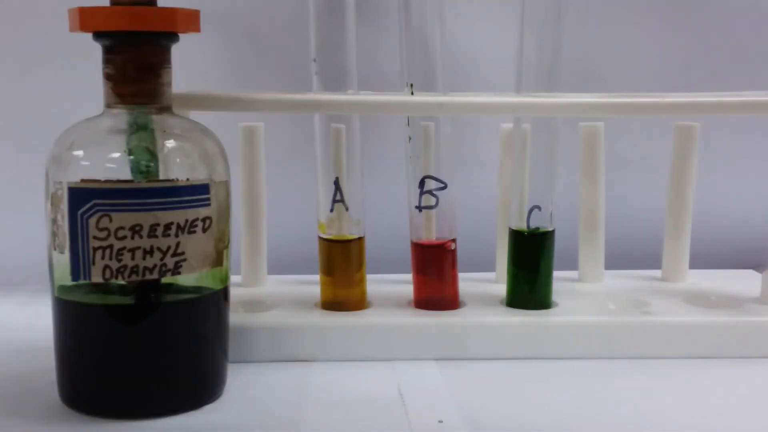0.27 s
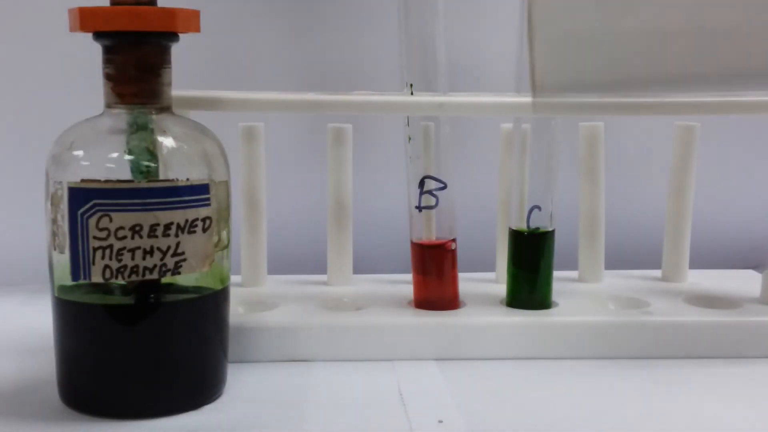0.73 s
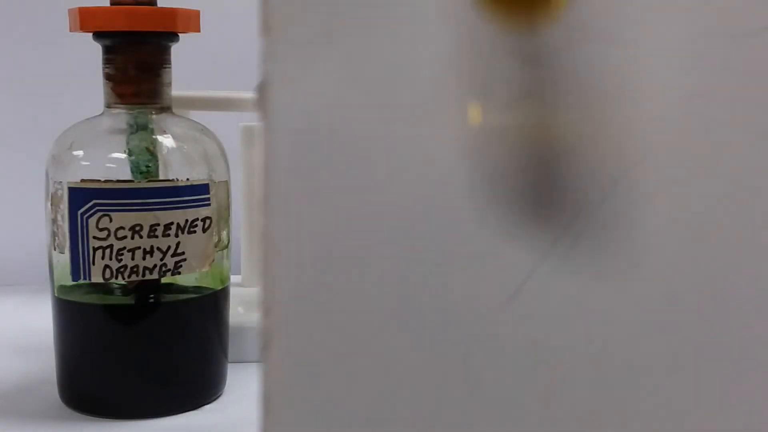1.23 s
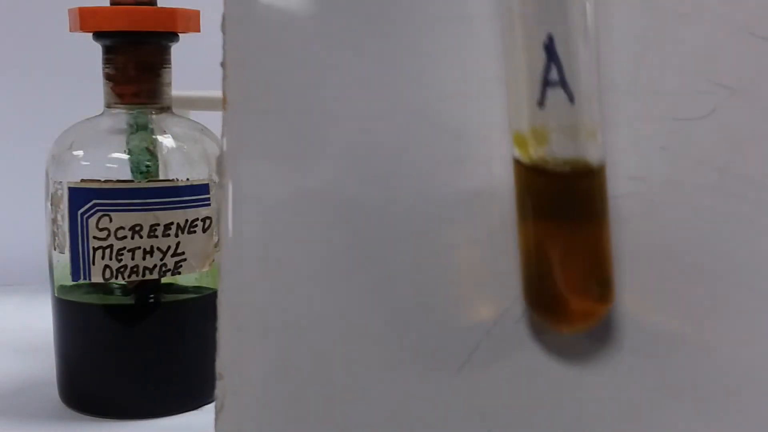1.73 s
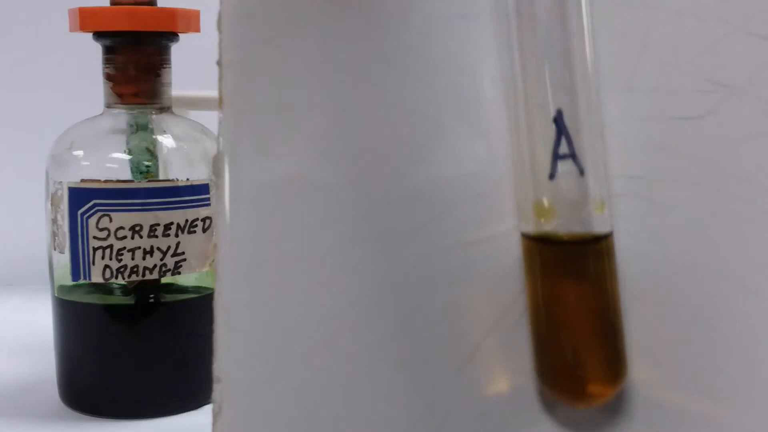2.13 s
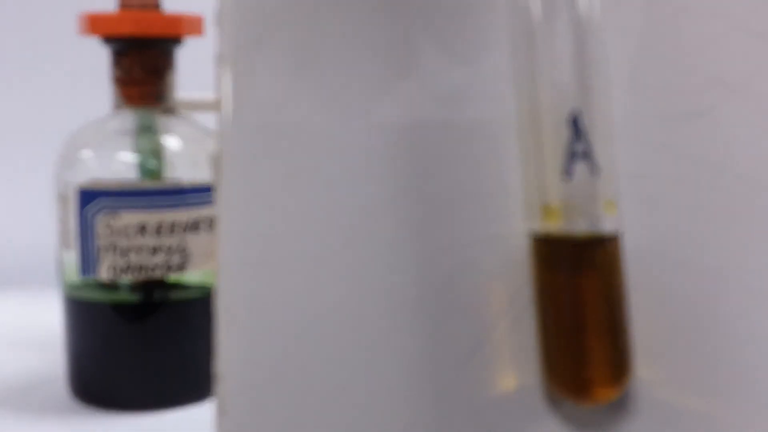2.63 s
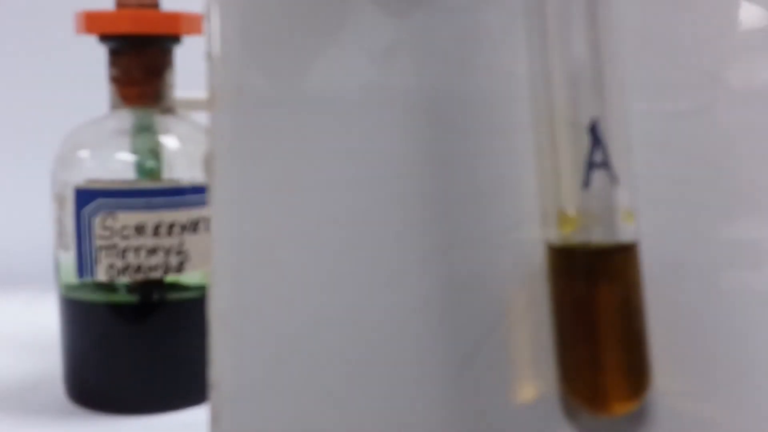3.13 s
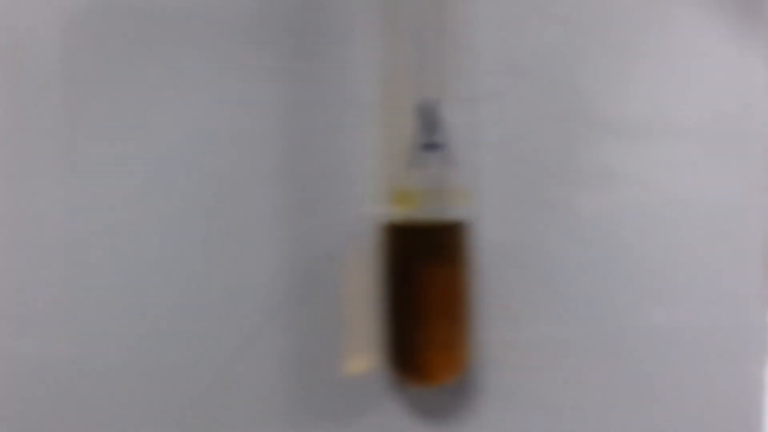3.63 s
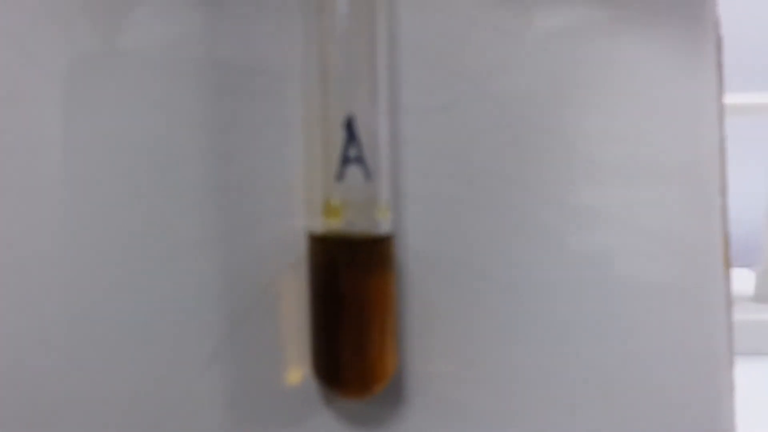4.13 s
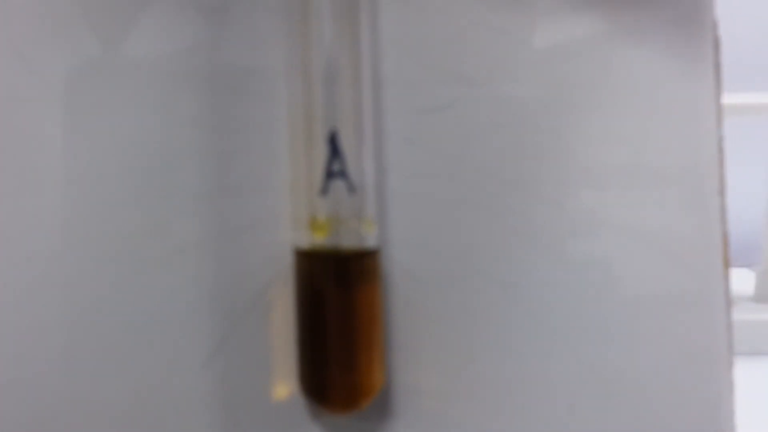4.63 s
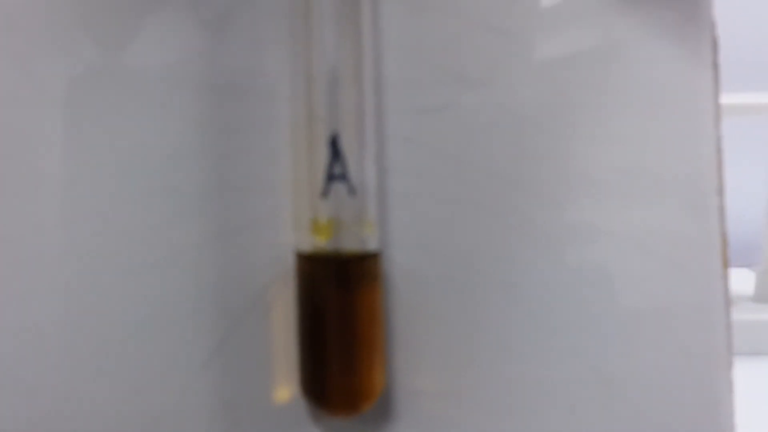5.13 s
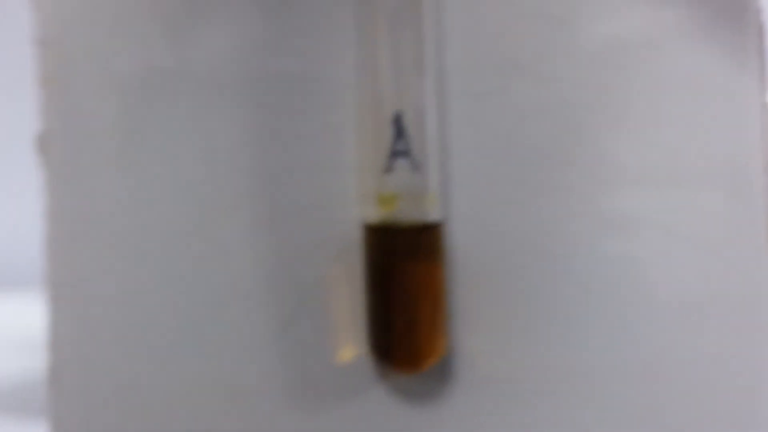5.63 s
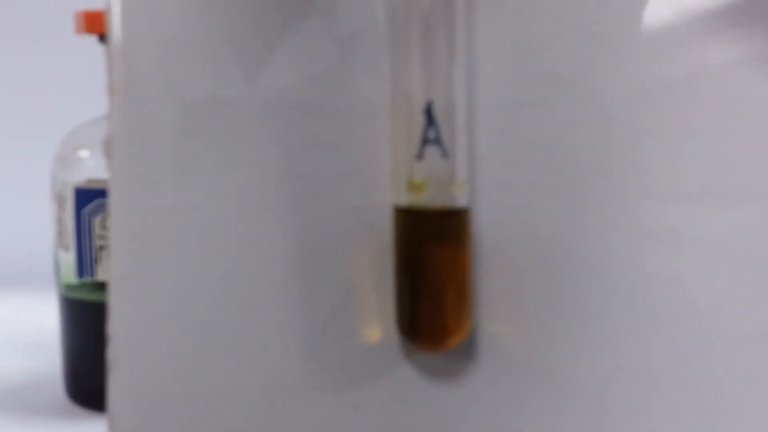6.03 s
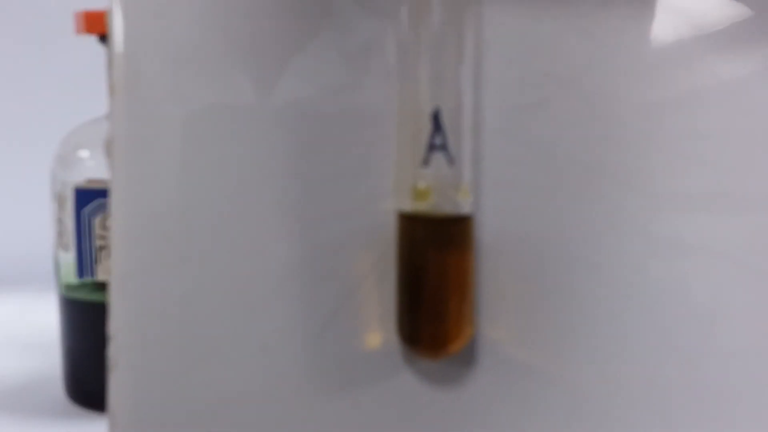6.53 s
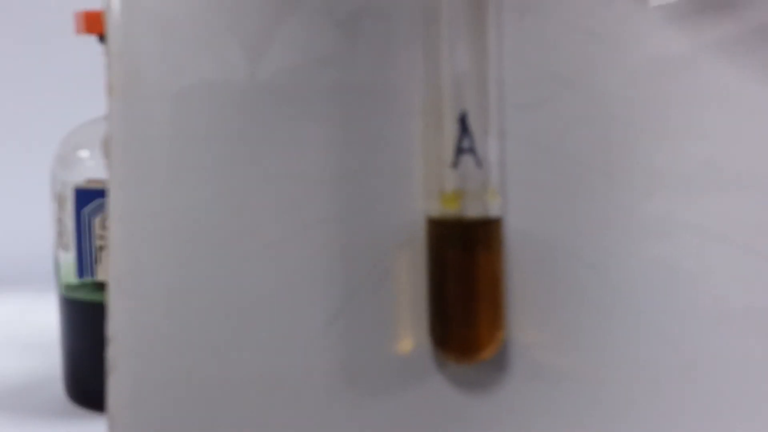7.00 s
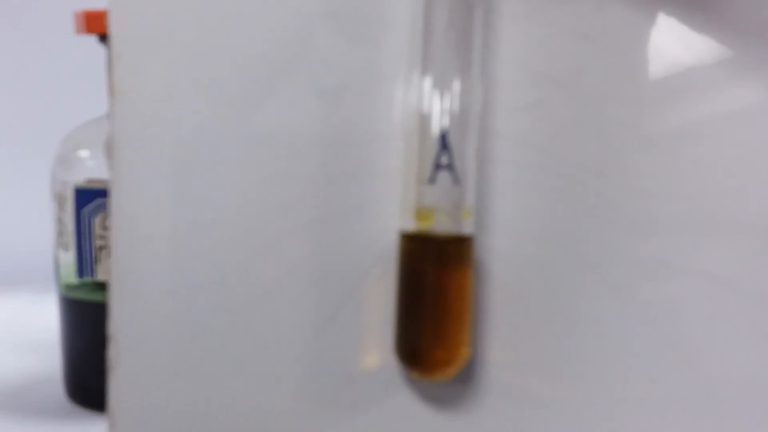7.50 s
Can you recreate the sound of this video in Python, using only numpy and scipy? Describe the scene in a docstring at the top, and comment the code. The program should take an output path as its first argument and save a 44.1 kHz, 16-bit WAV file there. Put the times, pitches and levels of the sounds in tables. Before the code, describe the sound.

Close, short glassy clinks and dull bumps of a test tube against ceramic, with tiny ticks and faint scrapes, above a quiet low hum.

```python
"""A glass test tube clinks and bounces on a ceramic tile, close to one microphone in a bare laboratory.
Each clink sums decaying glass modes and a noise crack; bumps ring the tile and bench, lower and softer.
Finger and grit ticks are tiny cracks with a high resonance; sliding glass is grainy friction noise.
Behind them hard walls return a diffuse tail of glass and tile, a far engine hums on two wavering orders,
and smooth noise makes the rush of the room. Both channels carry the same sound."""
import sys
import numpy as np
from scipy import signal
from scipy.fft import rfft, irfft
from scipy.io import wavfile

SR = 44100
rng = np.random.default_rng(int(sys.argv[2]) if len(sys.argv) > 2 else 0)


def master(y):
    """Save y as 16-bit WAV."""
    cut = np.clip(np.atleast_2d(y).T, -1, 1)
    pcm = np.round(cut * 32767)  # scale
    wavfile.write(sys.argv[1], SR, pcm.astype(np.int16))


N = 342216   # length of the scene [samples]

# Modes of the filled tube: (frequency [Hz], relative level [dB], free decay by 60 dB [s]);
# each contact sets the level and shortens or stretches the decay
TUBE_MODES = [(1110, 0, .13), (2822, 0, .075), (4675, 0, .05), (560, -9, .05), (1230, -12, .02),
              (1450, -1, .02), (1790, -3, .03), (2050, -11, .02), (3340, -8, .04), (3830, 0, .035),
              (4250, -8, .03), (5150, -4, .08), (5420, -3, .07), (5780, -5, .06), (6600, -10, .04),
              (6950, -3, .05), (7310, -3, .06), (8200, -7, .04), (9120, -8, .03), (9850, -1, .025),
              (10300, -6, .03), (11900, -6, .02), (12350, -1, .04), (13700, -9, .04), (14500, -10, .04)]
SPREAD_DB = 1.2          # the strike point changes each mode's share by about this much
STRIKE_CONTACT_S = 0.00065   # clinks and bumps


def from_db(db):
    """Gain of a level in dB."""
    return 10 ** (np.asarray(db) / 20)


def rms_one(x):
    """Scale to rms 1."""
    return x / np.sqrt(np.mean(x ** 2) + 1e-20)


def in_time(rows):
    """Columns of a curve table, one value a sample."""
    s, *columns = np.transpose(rows)
    return [np.interp(np.arange(N) / SR, s, column) for column in columns]


def at_hz(points, hz):
    """Read a spectrum on a log-frequency axis."""
    point_hz, values = np.transpose(points)
    return np.interp(np.log(hz + 1e-9), np.log(point_hz), values)


def coloured(x, spectrum):
    """Give white input the shape of the spectrum; rms 1."""
    gain = from_db(at_hz(spectrum, np.fft.rfftfreq(N, 1 / SR)))
    return rms_one(irfft(rfft(x) * gain, N))


def drift(rate_hz):
    """Slow random wander of spread 1: noise low-passed at the rate, its first second dropped."""
    lowpass = signal.butter(2, rate_hz, fs=SR, output="sos")
    return rms_one(signal.sosfilt(lowpass, rng.standard_normal(N + SR))[SR:])


def dying(length, t60):
    """Exponential decay over a number of samples, 60 dB down after t60 seconds."""
    return from_db(-60 * np.arange(length) / SR / t60)


def add(out, s, sound):
    """Mix a sound in at a time in seconds."""
    i = round(s * SR)
    out[i:i + len(sound)] += sound[:N - i]


def struck(hz, level_db, t60, contact_s):
    """Sum of decaying modes, a third of a second long; they swell while the contact lasts."""
    t = np.arange(SR // 3) / SR
    envelopes = from_db(level_db[:, None] - 60 * t / t60[:, None])
    modes = envelopes * np.sin(2 * np.pi * hz[:, None] * t)
    swell = np.sin(np.pi / 2 * np.clip(t / contact_s, 0, 1)) ** 2
    return modes.sum(axis=0) * swell


def clinks():
    """Each contact feeds the mode families in its own shares; the grip sets the ring; a crack fills between modes."""
    # Tube meets tile: (time [s], first bending note [dB], second [dB], upper [dB], clack [dB],
    # wall ring at the pivot [dB], wall brightness [dB per octave], ring factor the grip leaves the first note)
    contacts = [(1.33, -28, -38, -54, -60, -46, -3, .65), (1.6037, -13, -11.5, -7, -12, -18.5, 7, 1.33),
                (1.72, -18.5, -26, -16.5, -50, -25.5, 2, 0.62), (1.7318, -26, -39, -24, -21.5, -37, 1, .42),
                (2.047, -46, -45, -47, -40, -49, -1, .4), (2.2928, -31.5, -43, -46, -24.5, -47, 2, 0.67),
                (2.6463, -22, -24.5, -23, -21.5, -18.5, -8.5, 0.33),
                (2.66, -44, -32, -44, -16.5, -41, -2, 0.5), (2.8824, -24.5, -38, -37, -23.5, -45, 3, 0.23),
                (3.153, -20, -25.5, -28.5, -25.5, -35.5, -10, 0.13),
                (3.231, -49, -64, -57, -49, -42.5, -3, .4), (3.2697, -14, -23.5, -27, -32, -30, -3, 0.62),
                (3.2734, -39, -23, -22.5, -28, -27.5, 2, .4),
                (3.281, -15.5, -40, -17.5, -27, -25.5, 4.5, 0.53),
                (3.2886, -33, -25, -28, -35, -31.5, 10, 0.49), (3.47, -27.5, -41, -44, -27, -49, 12, .94),
                (3.57, -23.5, -34, -27, -29, -38, 4, 0.44), (3.615, -12, -31, -15, -15, -18.5, 9, 0.61),
                (3.751, -19, -33, -33.5, -29, -45, -2, .28),
                (3.8131, -13.5, -23, -17, -16.5, -17, 5.5, .24),
                (4.183, -19.5, -49, -19.5, -44, -22, -3, 0.31), (4.1919, -47, -23.5, -32, -15, -23, 5, .34),
                (4.257, -23.5, -35, -28, -28, -33.5, 1, 0.19), (4.635, -32, -36, -62, -26.5, -50, 18, .49),
                (5.1227, -16.5, -25.5, -28.5, -18.5, -33, -5.5, 0.19),
                (5.201, -46, -46, -49, -34, -63, 3, .33), (5.64, -33.5, -42, -48, -39, -51, 11, 0.63),
                (5.6715, -32, -36, -25, -33, -33, -6, 0.5), (5.674, -6, -24.5, -21, -23, -31, 3, 0.75),
                (5.679, -42, -15.5, -21, -38, -31, -4, .32), (5.6872, -19, -23, -20, -30, -26, 2, .4),
                (5.693, -42, -21, -17.5, -23, -31, 2, .34), (5.7375, -47, -56, -52, -41, -47, 4, .4),
                (6.7582, -23.5, -31, -15.5, -12, -22.5, -2, 0.19),
                (6.7728, -22, -31, -22, -20, -22, 1.5, .31)]
    # Borders of the nine families, in order first note, clack, second note, two upper, four wall: ([Hz])
    edges = [950, 1280, 2200, 3100, 4400, 4950, 6100, 7650, 11000, 15000]
    # Families whose band the crack fills; the two lowest notes stay clean: (family number)
    cracking = (1, 3, 4, 5, 6)
    # Usual shares of the two upper bending families: ([dB])
    upper_share = [-1, -2]
    # Usual shares of the four wall families, low to high, before the tilt: ([dB])
    wall_share = [0.5, -4, -1.5, -16]
    pivot_hz = 5500   # brightness tilts the wall families about this
    wall_ring = 0.6   # ring factor the grip leaves all modes but the first note
    bend_detune, wall_detune = 0.0033, 0.0075   # pitch scatter as grip and liquid shift [share]

    out = np.zeros(N)
    hz, mode_db, t60 = np.transpose(TUBE_MODES)
    family = np.searchsorted(edges, hz) - 1
    family[hz < edges[0]] = 1   # the low knock comes with the clack
    scatter = np.where(family < 5, bend_detune, wall_detune)
    bands = [signal.butter(3, edge, "band", fs=SR, output="sos") for edge in zip(edges, edges[1:])]
    wall_centre_hz = np.sqrt(np.multiply(edges[5:-1], edges[6:]))
    octaves = np.log2(wall_centre_hz / pivot_hz)

    for s, first_db, second_db, upper_db, clack_db, wall_db, tilt_db, bend_ring in contacts:
        upper_dbs = np.add(upper_db, upper_share)
        wall_dbs = wall_db + tilt_db * octaves + wall_share
        family_db = np.array([first_db, clack_db, second_db, *upper_dbs, *wall_dbs])
        louder, detune = rng.standard_normal((2, len(hz)))
        level_db = family_db[family] + mode_db + SPREAD_DB * louder
        ring = np.where(family == 0, bend_ring, wall_ring)
        add(out, s, struck(hz * (1 + scatter * detune), level_db, t60 * ring, STRIKE_CONTACT_S))
        crack = rng.standard_normal(SR // 20) * dying(SR // 20, t60=0.031)
        for k in cracking:
            add(out, s, from_db(family_db[k] + 4.5) * signal.sosfilt(bands[k], crack))
    # a thin tube radiates little bass
    return signal.sosfilt(signal.butter(2, 400, "high", fs=SR, output="sos"), out)


def bumps():
    """A broad soft contact: tile and bench ring and rattle, low-passed by the sharpness of the blow."""
    # Tile bumped on the bench: (time [s], relative level [dB], sharpness as upper cutoff [Hz])
    blows = [(0.3317, -26, 825), (1.217, -45, 1200), (1.33, -15, 1110), (3.2698, -17.5, 1240),
             (3.607, -6.5, 2600), (5.6717, -18, 980)]
    # Modes of tile and bench: (frequency [Hz], relative level [dB], decay by 60 dB [s])
    tile_modes = [(122.3, -9.5, 0.21), (212, -12, 0.18), (321.6, -7.5, 0.099), (533, -9, 0.11),
                  (691, 0, 0.026), (860, 2.5, 0.056), (1154, 6.5, 0.029), (1315, -0.5, 0.083),
                  (1364, -4, 0.1), (1670, 3.5, 0.019), (2110, -12, .03), (2780, -5, .03), (2900, -21, .03),
                  (3540, -8, .03)]
    out = np.zeros(N)
    hz, mode_db, t60 = np.transpose(tile_modes)
    for s, blow_db, sharp_hz in blows:
        level_db = mode_db + SPREAD_DB * rng.standard_normal(len(hz))
        rattle = rng.standard_normal(SR // 3) * dying(SR // 3, t60=0.097)
        body = struck(hz, level_db, t60, STRIKE_CONTACT_S) + from_db(11.0) * rattle
        soft = signal.butter(3, [110, sharp_hz], "band", fs=SR, output="sos")
        add(out, s, -from_db(blow_db - 6.0) * signal.sosfilt(soft, body))
    return out


def ticks():
    """A tiny hard contact: a short crack, one high resonance, and a faint ring of the whole tube."""
    # Fingers and grit on the glass: (time [s], relative level [dB], resonance [Hz])
    touches = [(0.445, -39, 10000), (3.504, -35, 9910), (3.5342, -30.5, 9800), (3.586, -36, 9650),
               (4.03, -46, 9700), (4.056, -44, 9800), (4.4293, -35, 9800), (4.4522, -36, 9800),
               (4.4777, -47, 9790), (4.592, -54, 10200), (5.2599, -38, 9700), (5.2894, -41, 12600),
               (5.301, -39, 12600), (5.388, -50, 9900), (5.5897, -43, 9600), (6.5735, -39, 9700),
               (6.992, -29, 10400), (7.1234, -28.5, 10100), (7.1891, -39, 10100), (7.207, -30.5, 10500),
               (7.231, -38, 10700), (7.433, -48, 10000), (7.545, -44, 10200), (7.57, -47, 10200),
               (7.59, -48, 10300)]
    out = np.zeros(N)
    hz, mode_db, t60 = np.transpose(TUBE_MODES)
    wide_band = signal.butter(2, [2500, 13000], "band", fs=SR, output="sos")
    for s, touch_db, top_hz in touches:
        crack = rng.standard_normal(SR // 20) * dying(SR // 20, t60=0.017)
        wide = signal.sosfilt(wide_band, crack)
        resonance = signal.iirpeak(top_hz, 12, fs=SR)
        narrow = signal.lfilter(*resonance, signal.lfilter(*resonance, crack))
        add(out, s, from_db(touch_db) * (0.04 * wide + 1.93 * narrow))
        ring_db = touch_db - 19 + mode_db + 4.8 * rng.standard_normal(len(hz))
        add(out, s, struck(hz, ring_db, 0.51 * t60, contact_s=0.00038))
    return out


def slide():
    """Uneven friction grains in patches, coloured by a narrow microphone resonance near 10 kHz; strokes fade in and out."""
    # Glass sliding on glaze, one row a stroke: (start [s], length [s], relative level [dB])
    stroke_rows = [(2.72, .19, -61), (3.143, .08, -55), (3.252, .11, -46.5), (3.358, 0.27, -61.5),
                   (4.31, .09, -64), (5.227, 0.17, -63.5), (5.375, 0.55, -58.5), (6.94, .09, -56),
                   (7.17, 0.13, -57)]
    # Shape of the friction spectrum: (frequency [Hz], relative density [dB per Hz])
    friction_colour = [(2000, -6), (3500, -8), (6000, -6.5), (11200, -22), (14300, -18), (16000, -29)]
    rise, fall = 0.3, 0.31   # shares of a stroke spent swelling and fading

    unevenness_db = 3.1 * np.minimum(rng.exponential(1, N), 5.5)
    patches_db = 2.3 * drift(60)
    grains = rng.standard_normal(N) * from_db(unevenness_db + patches_db)
    strokes = np.zeros(N)
    for s, length, db in stroke_rows:
        progress = (np.arange(N) / SR - s) / length
        strokes += from_db(db) * np.interp(progress, [0, rise, 1 - fall, 1], [0, 1, 1, 0])
    mic_peak = rms_one(signal.lfilter(*signal.iirpeak(10100, 14.0, fs=SR), grains))
    return strokes * (from_db(4.5) * coloured(grains, friction_colour) + from_db(-7.5) * mic_peak)


def room(x):
    """Diffuse tail of hard walls: noise dying at its own rate in each octave, building up after a short gap."""
    # Reverberation: (frequency [Hz], decay by 60 dB [s])
    wall_t60 = [(100, 1.56), (700, 0.8), (3000, 1.09), (6000, 0.59), (14000, 1.1)]
    length = int(1.5 * SR)
    tail = np.zeros(length)
    for hz in 62.5 * 2. ** np.arange(9):
        edges = [hz / np.sqrt(2), min(hz * np.sqrt(2), SR / 2.1)]
        octave = signal.butter(2, edges, "band", fs=SR, output="sos")
        noise = signal.sosfilt(octave, rng.standard_normal(length))
        tail += noise * dying(length, at_hz(wall_t60, hz))
    build_up = np.clip((np.arange(length) / SR - .008) / 0.0079, 0, 1)
    return signal.fftconvolve(x, tail * build_up / 10)[:N]


def engine():
    """A far engine: two low orders that waver in level and a little in pitch."""
    # Course before wavering: (time [s], firing rate [Hz], first order [dB rms], second order [dB rms])
    course = [(0, 57, -64, -55), (.9, 56, -58, -52), (1.7, 57, -58, -54), (2.3, 57, -61, -53),
              (2.7, 58.5, -58, -54.5), (3.3, 59.5, -53, -49.5), (4, 60, -59, -46.5), (4.6, 60.5, -54, -52),
              (5.3, 61, -51, -49.5), (5.8, 60, -64, -51), (6.4, 60, -57, -46), (6.8, 59.5, -52.5, -57),
              (7.3, 59, -48.5, -51.5), (7.76, 59, -45, -48)]
    hz, first_db, second_db = in_time(course)
    turn = 2 * np.pi * np.cumsum(hz * (1 + 0.0072 * drift(3.0))) / SR
    first = from_db(first_db + 1.0 * drift(9.0)) * np.sin(turn)
    second = from_db(second_db + 1.3 * drift(3.1)) * np.sin(2 * turn)
    return np.sqrt(2) * (first + second)


def rush():
    """Air handling and distant traffic: smooth noise falling towards the treble."""
    # Shape of the spectrum: (frequency [Hz], relative density [dB per Hz])
    rush_colour = [(30, -25), (42, -32), (55, -14.5), (90, -8), (130, -7.5), (230, -7), (400, -14),
                   (500, -12), (1100, -18), (1940, -22), (2300, -27.5), (5000, -32), (8000, -41.5),
                   (10000, -40), (11500, -48), (16000, -50)]
    # Level before wavering: (time [s], level [dB rms])
    swell = [(0, -45.5), (1.2, -44.5), (2.2, -47.5), (3.5, -44.5), (5, -46.5), (6.3, -45), (7.76, -45)]
    level_db = in_time(swell)[0] + 0.79 * drift(9)
    return from_db(level_db) * coloured(rng.standard_normal(N), rush_colour)


def scene():
    """Near sources, the room tail of glass and tile, and the steady bed, all at one microphone."""
    # Band of the glass that reaches the walls: (low edge, high edge [Hz])
    send_band = (696, 8200)
    glass_wet_db, tile_wet_db = -29.5, -21.5   # sends to the room
    glass, tile = clinks() + ticks(), bumps()
    sent = signal.lfilter(*signal.butter(1, send_band, "band", fs=SR), glass)
    tail = room(from_db(glass_wet_db) * sent + from_db(tile_wet_db) * tile)
    mono = glass + tile + slide() + tail + engine() + rush()
    return np.stack([mono, mono])


def record(dry):
    """Peaks are clipped, then a steep low-pass cuts the top."""
    top_cut = signal.ellip(12, .5, 90, 15900, fs=SR, output="sos")
    return signal.sosfilt(top_cut, np.clip(dry, -.95, .95))


dry = scene()
out = record(dry)
master(out)
```